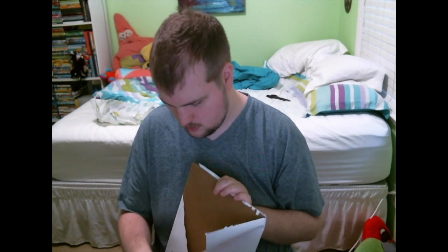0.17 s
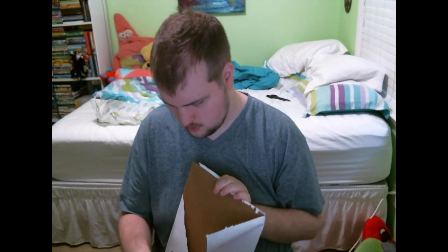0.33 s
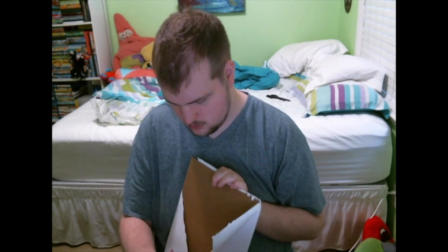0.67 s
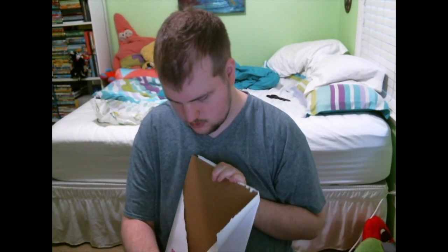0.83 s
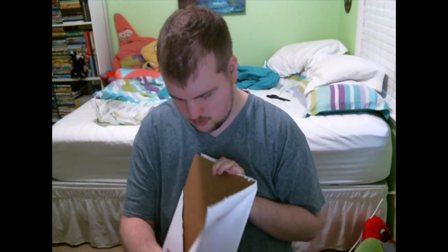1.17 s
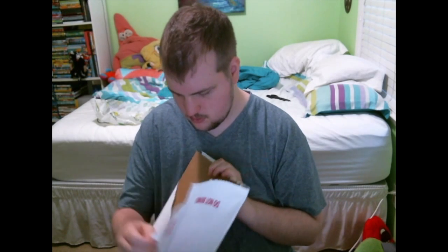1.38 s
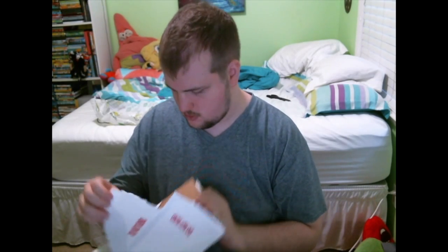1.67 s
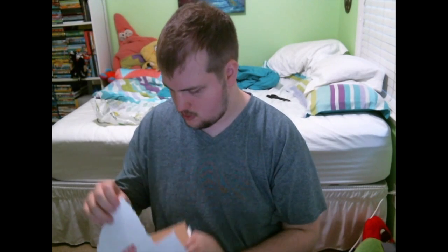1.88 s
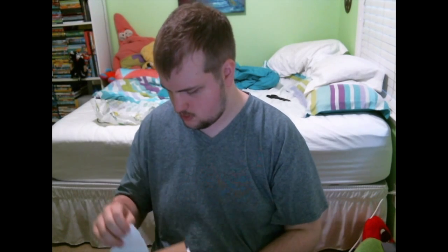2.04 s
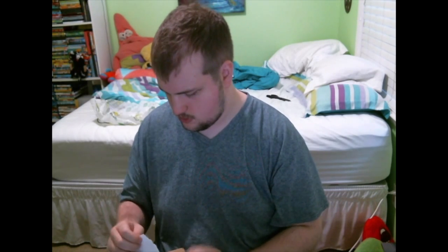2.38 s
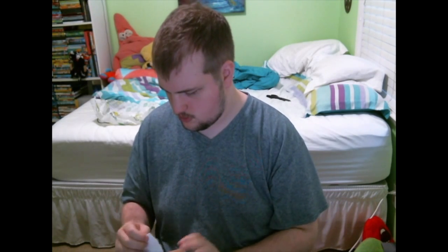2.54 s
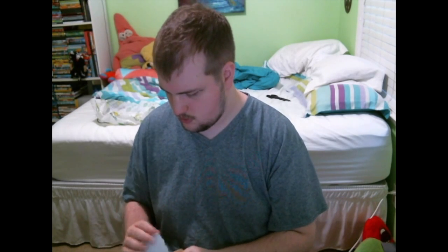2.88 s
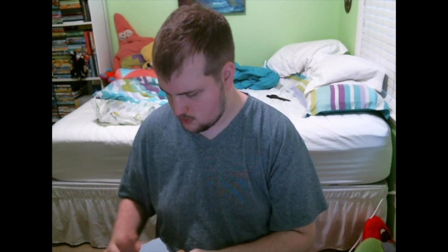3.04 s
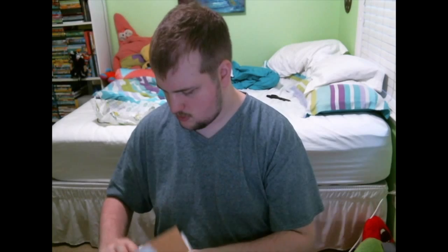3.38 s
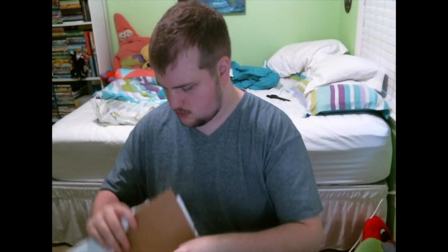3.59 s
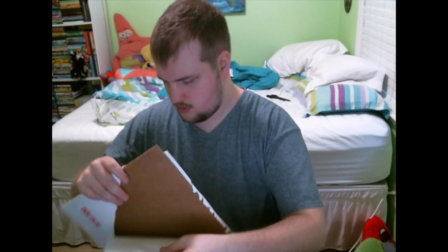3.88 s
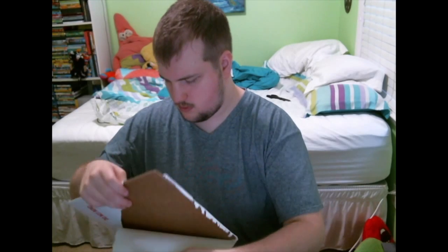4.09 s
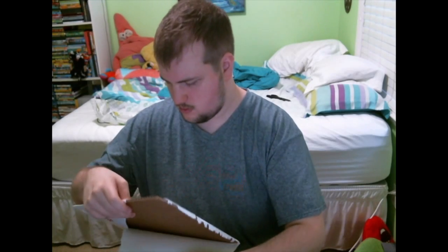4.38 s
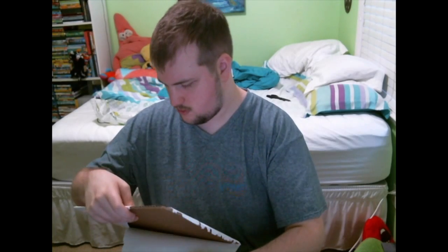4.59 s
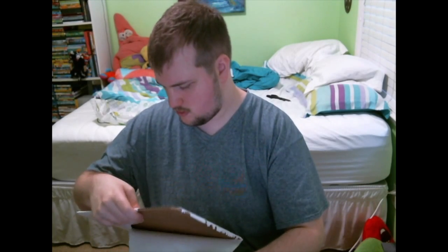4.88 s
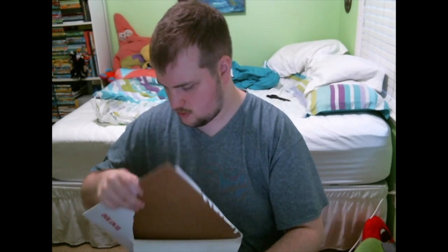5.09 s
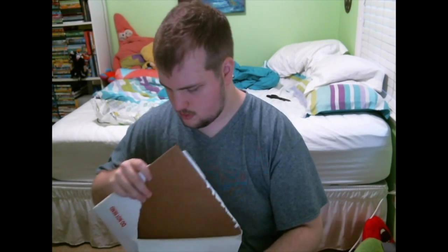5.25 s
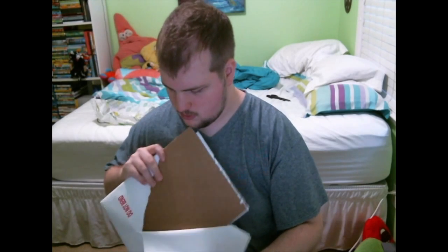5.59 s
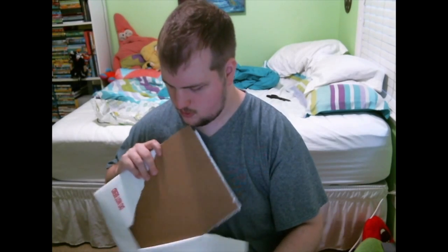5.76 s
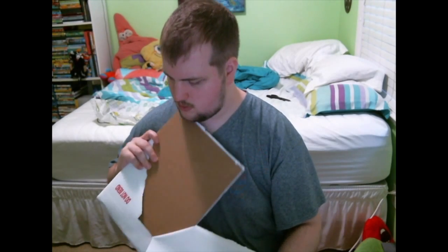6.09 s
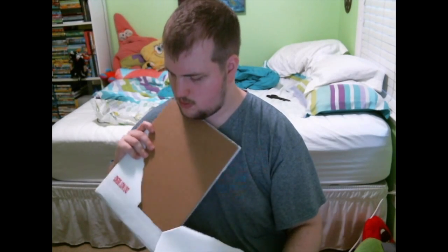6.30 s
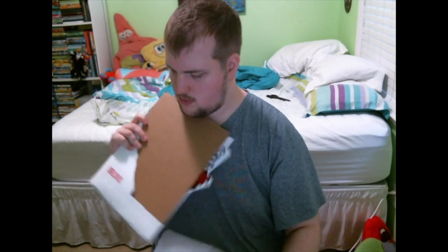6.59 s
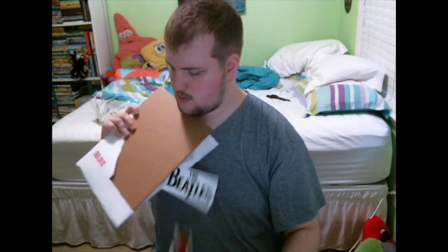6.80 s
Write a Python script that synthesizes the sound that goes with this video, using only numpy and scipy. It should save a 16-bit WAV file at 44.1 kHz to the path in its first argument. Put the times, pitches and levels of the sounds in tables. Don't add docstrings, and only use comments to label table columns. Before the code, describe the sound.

Close up in a small bedroom, a stiff paper mailer finishes tearing with a loud, crackling rip that dies within half a second. Faint finger rustles, small card taps and a soft slide over cloth follow. Then the card is bent and pulled, with sharp knocks, snapping creases and hollow crackles. Low ventilation rumble and slight hiss lie beneath.

```python
import sys
import numpy as np
from scipy import signal
from scipy.fft import rfft, irfft, next_fast_len
from scipy.io import wavfile

SR = 44100
rng = np.random.default_rng(int(sys.argv[2]) if len(sys.argv) > 2 else 0)


def makeup_ratio(level_db):
    decades = np.asarray(level_db, float) / 20
    return 10 ** decades


def pcm_store(signal):
    levels = np.round(np.clip(np.atleast_2d(signal), -1, 1) * 32767)
    wavfile.write(sys.argv[1], SR, levels.astype(np.int16).T)


N = 305613

# (peak time [s], crispness [dB], rise [s], fall [s], depth [dB])
TEAR_STROKES = [
    (0.001, -20, 0.0062, 0.027, -2),
    (0.019, -23, .006, .03, -4.5),
    (0.06, -26, .15, 0.1, -6),
    (0.095, -30.5, .005, 0.2, 1),
    (0.237, -39, 0.044, 0.037, 3.5),
    (0.31, -49, 0.17, 0.44, 1),
    (0.41, -41, 0.018, 0.22, -5.5),
    (0.5, -44, 0.45, 0.15, 8),
    (0.652, -55, 0.014, 0.11, 2),
]
# (peak time [s], crispness [dB], rise [s], fall [s], depth [dB])
PULL_STROKES = [(4.714, -62, 0.034, 0.26, 7), (4.892, -64, 0.066, 0.12, 5), (5.003, -83, 0.01, .13, 41.5),
                (5.121, -50.5, 0.0057, 0.077, 6.5), (5.171, -43.5, 0.038, .05, -1.5),
                (5.22, -63, .1, 0.45, -0.5), (5.34, -52.5, 0.045, 0.27, -6),
                (5.396, -32.5, 0.011, 0.063, -3), (5.472, -34.5, 0.079, 0.062, 4),
                (5.632, -40.5, 0.014, .12, 8), (5.71, -30, 0.15, 0.3, -0.5), (5.782, -35.5, 0.098, 0.16, 4),
                (5.985, -39, 0.0071, 0.16, -6), (6.03, -36, 0.012, 0.063, -3),
                (6.094, -37.5, 0.0265, 0.024, 10), (6.14, -47, 0.012, 0.41, 8.5),
                (6.209, -38.5, 0.027, 0.327, 5.5), (6.286, -33, 0.34, 0.091, -16),
                (6.472, -40.5, 0.15, 0.29, 0.5), (6.534, -39, 0.011, 0.12, -3),
                (6.612, -32, 0.047, 0.048, 0.5), (6.65, -48.5, 0.037, 0.05, 16),
                (6.722, -58, 0.041, 0.08, 17), (6.841, -56, 0.28, 0.47, -1.5), ]
# (peak time [s], fine hiss [dB], rise [s], fall [s], depth [dB])
TOUCH_STROKES = [(0.7, -62, 0.048, 0.032, -10), (0.85, -68.5, 0.32, 1, 5.5), (1.09, -62, 0.22, 0.075, 3),
                 (1.21, -66.5, 0.087, 0.17, -19), (1.392, -71, .012, 0.046, 28), (1.422, -75, .005, .1, 26),
                 (1.523, -63.5, .07, 0.13, -10), (1.62, -68, 0.16, 1, 4.5), (1.757, -63.5, 0.04, 0.1, 4),
                 (1.92, -91, .3, 0.25, 14), (2.075, -69, 0.013, 0.26, 6), (2.263, -75, 0.078, 0.15, 15.5),
                 (2.435, -68, 0.027, 0.072, 9.5), (2.674, -63.5, .1, 0.12, 5.5), (2.86, -74, 0.42, 0.28, 5),
                 (3.014, -78.5, 0.014, 0.036, 9), (3.3, -71.5, 0.069, 0.23, 7),
                 (4.03, -78, 0.095, 0.034, 4), (4.164, -79.5, 0.012, .06, 3), (4.604, -80.5, .04, .14, 10)]
# (peak time [s], fine hiss [dB], rise [s], fall [s], depth [dB])
SLIDE_STROKES = [
    (3.43, -80.5, 0.15, 1, 15),
    (3.6, -76, 0.51, .2, -7),
    (3.675, -65.5, 0.03, 0.26, 5),
    (3.74, -58.5, .25, 0.13, 3),
    (3.9, -82, 0.25, 0.18, 20),
]
# (frequency [Hz], level [dB per Hz])
SHEET_COLOUR = [(150, -23.5), (250, -19.5), (320, -3), (540, -7), (790, -5), (1160, -5.5), (3000, -10.5),
                (7200, -16), (10500, -19), (12900, -28), (16000, -39)]
# (frequency [Hz], width [Hz], level [dB])
POCKET_MODES = [(164, 110, -11), (308, 33.4, 0), (495, 155, 1), (716, 33, -13)]
# (time [s], peak [dB], low ring [Hz], high ring [Hz], high ring relative level [dB])
CREASE_SNAPS = [(0.002, -7, 1030, 1790, -4), (0.016, -14, 1040, 1150, -1), (0.067, -22, 980, 1700, 10),
                (0.0905, -13.5, 980, 1110, 1), (0.405, -36, 666, 1900, -14), (0.494, -29, 476, 2080, -2),
                (5.336, -34.5, 466, 1670, -0.5), (5.395, -20, 560, 1600, -5),
                (5.442, -21.5, 417, 2180, -10), (5.477, -16.5, 737, 1600, -9), (5.61, -35, 390, 2400, -21),
                (5.98, -24.5, 385, 1800, -1), (6.022, -21.5, 484, 1730, -4), (6.09, -31, 468, 1358, 20),
                (6.199, -17.5, 475, 1740, -9), (6.259, -21, 580, 1620, 6), (6.529, -24, 1000, 1580, 2),
                (6.718, -20, 641, 1140, 6), (6.868, -30.5, 695, 1420, -8)]
# (time [s], peak [dB], low ring [Hz], high ring [Hz], high ring relative level [dB])
CARD_KNOCKS = [(1.388, -27, 580, 1200, -2), (1.4175, -28, 1080, 2080, -4), (1.759, -38.5, 596, 1500, -5),
               (1.834, -31, 910, 1880, 4), (2.03, -35, 435, 1560, -10), (2.201, -47, 382, 1070, -4),
               (2.473, -42.5, 566, 1260, -5), (2.795, -35, 1070, 1640, -8), (2.878, -39.5, 420, 1040, -13),
               (2.892, -37, 495, 1280, -5), (3.304, -28.5, 526, 1660, -13), (4.71, -38, 950, 1520, 0),
               (4.762, -36.5, 970, 1280, -2), (4.875, -36.5, 918, 1370, 1), (4.996, -17.5, 680, 1650, -6.5),
               (5.114, -13, 630, 1440, 1)]
# (time [s], peak [dB])
PAPER_CRACKS = [(0.0174, -6.5), (0.0205, -5), (0.0915, -5), (0.2304, -28), (0.2941, -23), (0.3092, -19.5),
                (0.3221, -20), (0.409, -21.5), (0.4973, -20), (0.6555, -25.5), (5.1156, -20), (5.1677, -37),
                (5.3746, -28), (5.3896, -30), (5.4543, -16), (5.5982, -41), (5.6127, -19.5), (5.6775, -13),
                (5.7099, -11), (5.8252, -21), (5.9784, -19), (6.0272, -16.5), (6.0911, -23), (6.1332, -26),
                (6.1792, -30), (6.2105, -44), (6.2802, -16.5), (6.4283, -23), (6.5303, -17),
                (6.6097, -15.5),
                (0.7618, -40), (0.852, -52), (0.9118, -41), (1.498, -41), (1.7567, -38), (1.835, -39.5),
              (2.0747, -57), (2.265, -47.5), (2.4319, -53), (2.6289, -49), (3.3062, -41), (3.6673, -46),
              (4.608, -51), (4.6947, -53), (4.7092, -43), (4.7722, -37), (5.3421, -43), (5.357, -37),
              (6.8039, -50)]
# (frequency [Hz], time to fall 60 dB [s])
ROOM_DECAY = [(200, 0.17), (1000, 0.2), (4000, 0.1), (12000, 0.009)]
# (frequency [Hz], level [dB per Hz])
AIR_COLOUR = [(8, -4.5), (25, -4), (50, -3.5), (80, -8.5), (125, -21), (170, -32), (260, -33), (550, -33),
              (850, -40.5), (1500, -49.5), (3200, -64), (6000, -68), (12000, -70), (16000, -71.5)]


def ripping():
    boom_share, sheet_share = 0.92, 0.6
    crisp_db = to_db(strokes(TEAR_STROKES) + strokes(PULL_STROKES))
    boom_db = to_db(strokes(TEAR_STROKES, boom_share, -8.0) + strokes(PULL_STROKES, boom_share, 0.45))
    sheet_db = to_db(strokes(TEAR_STROKES, sheet_share, -1.5) + strokes(PULL_STROKES, sheet_share, -2))

    source = breaks(4000, spread_db=3.0, clump_db=1.13, rub=0.3, jerk=1.02)
    paper = rms_one(coloured(panels(source, share_db=-14), SHEET_COLOUR))
    boom = 0
    for k, (hz, width_hz, level_db) in enumerate(POCKET_MODES):
        boom = boom + makeup_ratio(level_db) * (-1) ** k * resonance(source, hz, width_hz)
    levels_db = [crisp_db - 56.5, sheet_db + 0.5, sheet_db + 4.5, crisp_db + 4.0]
    return sheet(paper, levels_db, [500, 900, 2300, 4800]) + rms_one(boom) * makeup_ratio(boom_db - 2.5)


def breaks(per_s, spread_db, clump_db, rub, jerk):
    jerks_per_s, jerk_dies_s = 70.0, 0.0053
    sizes = makeup_ratio(spread_db * np.minimum(rng.exponential(1, N), 5)) * rng.choice([-1, 1], N)
    born = rng.random(N) < per_s / SR
    mix = np.sqrt(1 - rub) * rms_one(sizes * born) + np.sqrt(rub) * rng.standard_normal(N)
    jerks = rng.random(N) * (rng.random(N) < jerks_per_s / SR)
    jerks = signal.lfilter([jerk], [1, -np.exp(-1 / (jerk_dies_s * SR))], jerks)
    clumps_db = clump_db * (drift(45) + 0.53 * drift(5.2))
    return rms_one(mix * (1 + jerks) * makeup_ratio(clumps_db))


def panels(source, share_db):
    pitches_hz = np.geomspace(900, 9000, 26) * (1 + 0.043 * rng.standard_normal(26))
    rings = sum(resonance(source, hz, 0.019 * hz) * makeup_ratio(7.1 * drift(11.0)) for hz in pitches_hz)
    return rms_one(source + makeup_ratio(share_db) * rms_one(rings))


def sheet(source, controls_db, control_hz):
    size, hz = spectrum_axis()
    place = np.interp(np.log(hz), np.log(control_hz), np.arange(len(control_hz)))
    spectrum = rfft(source, size)
    out = 0
    for k, level_db in enumerate(controls_db):
        region = irfft(spectrum * np.clip(1 - abs(place - k), 0, 1), size)[:N]
        out = out + region * makeup_ratio(level_db)
    return out


def strokes(rows, depth_share=0, offset_db=0):
    t, power = np.arange(0, N + 16, 16) / SR, 1e-14
    for s, level_db, rise_s, fall_s, depth_db in rows:
        away = np.where(t < s, (s - t) / max(rise_s, 0.004), (t - s) / max(fall_s, 0.004))
        power = power + makeup_ratio(level_db + offset_db + depth_share * depth_db - 20 * away) ** 2
    return np.interp(np.arange(N) / SR, t, power)


def to_db(power):
    return 10 * np.log10(power)


def rms_one(x):
    return x / np.sqrt(np.mean(x ** 2) + 1e-20)


def drift(rate):
    r = np.exp(-40 * np.pi * rate / SR)
    slow = signal.lfilter([1], [1, -2 * r, r * r], rng.standard_normal(N // 20 + 2002))[2000:]
    return np.interp(np.arange(N) / 20, np.arange(len(slow)), rms_one(slow))


def resonance(x, hz, width_hz):
    r = np.exp(-np.pi * width_hz / SR)
    poles = [1, -2 * r * np.cos(2 * np.pi * hz / SR), r * r]
    return signal.lfilter((1 - r * r) / 2 * np.array([1, 0, -1]), poles, x)


def spectrum_axis(extra=0):
    size = next_fast_len(N + extra)
    return size, np.maximum(np.arange(size // 2 + 1) * SR / size, 1)


def at_hz(points, hz):
    table_hz, values = np.array(points).T
    return np.interp(np.log(hz), np.log(table_hz), values)


def coloured(x, points):
    size, hz = spectrum_axis()
    return irfft(rfft(x, size) * makeup_ratio(at_hz(points, hz)), size)[:N]


def cracks(rows):
    out, t = np.zeros(N + 1024), np.arange(1024) / SR
    fade = np.exp(-t / 0.00058) + 0.055 * np.exp(-t / 0.0047)
    bright = signal.butter(2, [2000, 8500], "band", fs=SR, output="sos")
    bursts = signal.sosfilt(bright, rng.standard_normal((len(rows), 1024)) * fade)
    for (s, peak_db), burst in zip(rows, bursts):
        at = max(round(s * SR), 0)
        out[at:at + 1024] += makeup_ratio(peak_db - 3.5) * burst / abs(burst).max()
    return out[:N]


def strays():
    per_s, over_crispness_db = 52, 11.5
    when, size = rng.random((400, 2)).T
    when = np.cumsum(-np.log(1 - when)) / per_s
    at = (when[when < N / SR] * SR).astype(int)
    crisp_db = to_db(strokes(TEAR_STROKES) + strokes(PULL_STROKES))[at]
    return list(zip(at / SR, crisp_db + over_crispness_db - 12.0 * size[:len(at)]))


def snaps(rows, rattle_db):
    out, t = np.zeros(N + 4096), np.arange(4096) / SR
    noise = rng.standard_normal((len(rows), 2, 4096))
    dull = signal.butter(2, [400, 2800], "band", fs=SR, output="sos")
    soft = signal.butter(3, 3000, fs=SR, output="sos")
    late = np.maximum(t - 0.0013, 0)
    thump = 12 * late * np.exp(-late / 0.00013)
    for (s, peak_db, low_hz, high_hz, high_db), (rough, rattle) in zip(rows, noise):
        push = signal.sosfilt(soft, thump + 0.3 * t * rough * np.exp(-t / 0.0011))
        modes = [(low_hz, 280), (high_hz, 620), (330, 200)]  # (frequency [Hz], width [Hz])
        low, high, card = (resonance(resonance(push, *mode), *mode) for mode in modes)
        panel = low / abs(low).max()
        panel = panel - makeup_ratio(high_db + 5.5) * high / abs(high).max() - makeup_ratio(-10) * card / abs(card).max()

        shaken = rattle * (1 - np.exp(-t / 0.0025)) * np.exp(-t / 0.015)
        tail = signal.sosfilt(dull, shaken) + makeup_ratio(2.5) * resonance(shaken, low_hz, 130)
        at = max(round(s * SR), 0)
        out[at:at + 4096] += makeup_ratio(peak_db - 3.0) * (panel / abs(panel).max() + makeup_ratio(rattle_db) * tail)
    return out[:N]


def handling():
    moves, edge_share = TOUCH_STROKES + SLIDE_STROKES, 0.13
    crisp_db = to_db(strokes(moves) + makeup_ratio(-93) ** 2)
    sheet_db = to_db(strokes(moves, 0.9) + makeup_ratio(-71.5) ** 2)
    edges = strokes(TOUCH_STROKES, edge_share, -1.5) + strokes(SLIDE_STROKES, edge_share, 0.5)
    edge_db = to_db(edges + makeup_ratio(-82.5) ** 2)

    rubbing = breaks(3000, spread_db=1.5, clump_db=0.93, rub=0.87, jerk=0.64)
    source = panels(rubbing, share_db=-11.5)
    levels_db = [sheet_db - 61, sheet_db + 8.0, edge_db + 8.0, crisp_db + 6.5, crisp_db + 4.5, crisp_db - 11.0]
    brushed = sheet(source, levels_db, [400, 1800, 4600, 7500, 11500, 14500])
    weave = rms_one(resonance(source, 5000, 1500))
    return makeup_ratio(1) * np.sqrt(strokes(SLIDE_STROKES)) * weave + brushed


def bedroom(x):
    size, hz = spectrum_axis(SR)
    t60 = np.maximum(at_hz(ROOM_DECAY, hz), 0.02)
    walls = 0
    for k, lag_s in enumerate(rng.uniform(0.005, 0.024, 10)):
        loop = makeup_ratio(-60 * lag_s / t60) * np.exp(-2j * np.pi * hz * lag_s)
        walls = walls + (-1) ** k * loop / (1 - loop)
    return irfft(rfft(x, size) * walls, size)[:N]


def air():
    level_db = -40 + 0.8 * drift(2.5)
    return makeup_ratio(level_db) * rms_one(coloured(rng.standard_normal(N), AIR_COLOUR))


def scene():
    rubbed = ripping() + handling()
    creases = snaps(CREASE_SNAPS, rattle_db=-7.5) + snaps(CARD_KNOCKS, rattle_db=-11)
    creases = creases + cracks(PAPER_CRACKS)
    wet = bedroom(makeup_ratio(-16) * rubbed + makeup_ratio(-11.5) * creases)
    capsule = signal.butter(2, 13500, fs=SR, output="sos")
    paper = signal.sosfilt(capsule, rubbed + creases + wet + cracks(strays()))
    return (paper + air())[None]


def roll_off(x):
    return signal.sosfilt(signal.butter(12, 15830, fs=SR, output="sos"), x)


def record(dry):
    rounded = 0.7 * np.tanh(dry / 0.7)
    return roll_off(rounded + 0.0039)


dry = scene()
out = record(dry)
pcm_store(out)
```